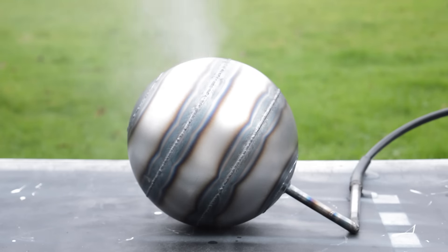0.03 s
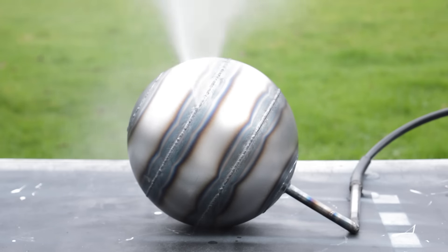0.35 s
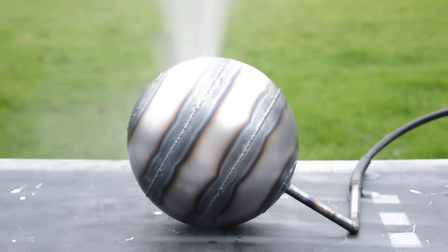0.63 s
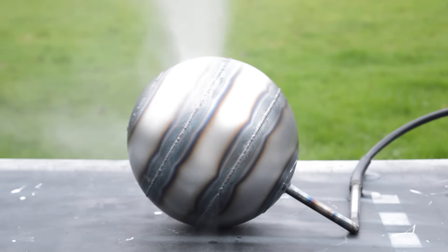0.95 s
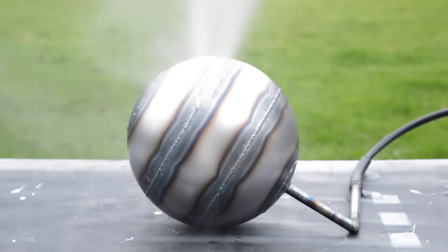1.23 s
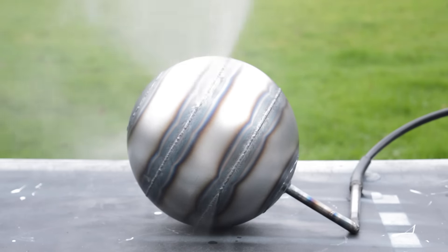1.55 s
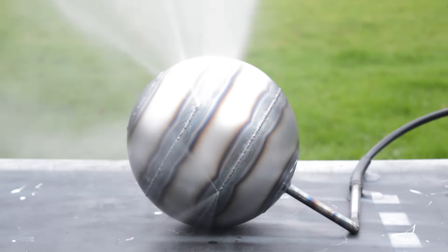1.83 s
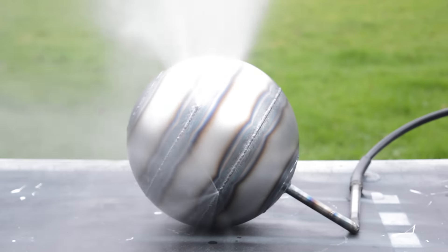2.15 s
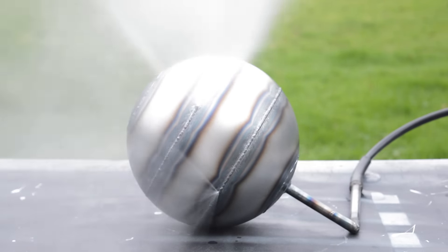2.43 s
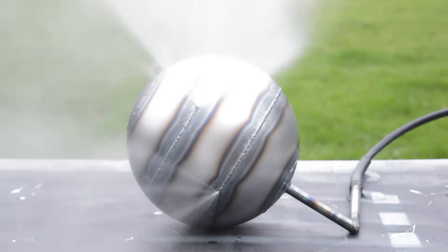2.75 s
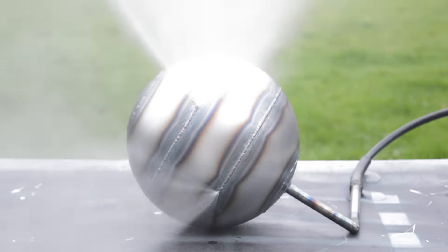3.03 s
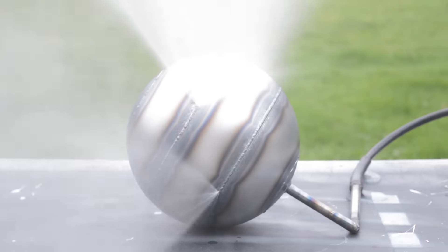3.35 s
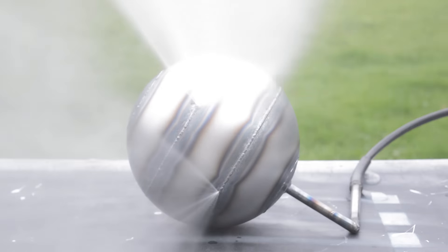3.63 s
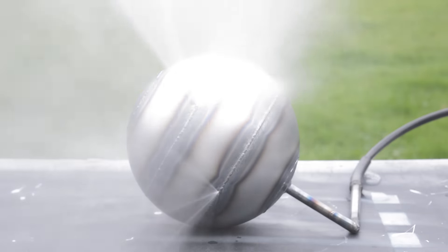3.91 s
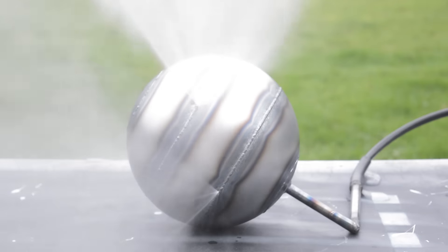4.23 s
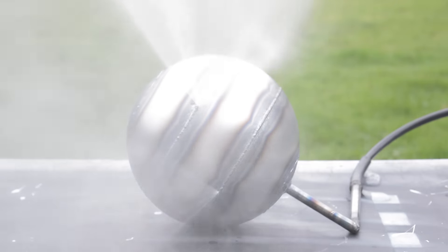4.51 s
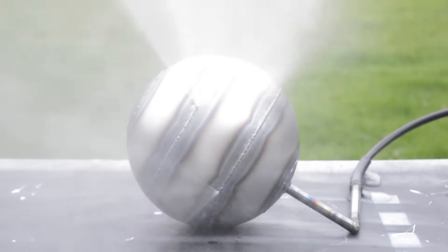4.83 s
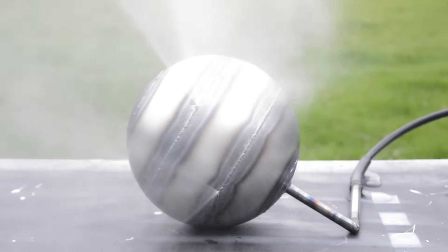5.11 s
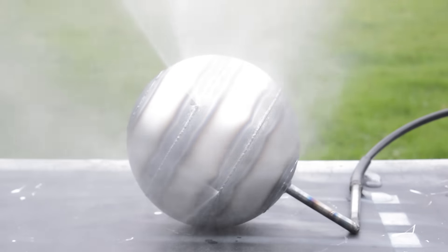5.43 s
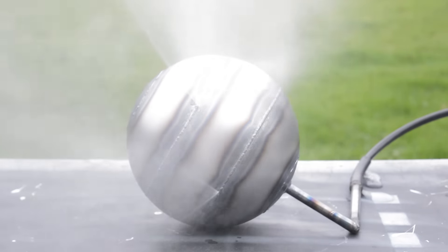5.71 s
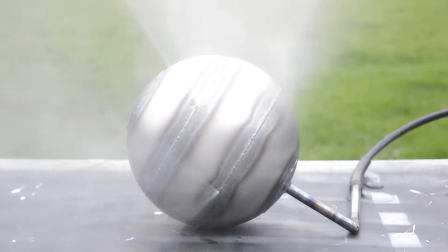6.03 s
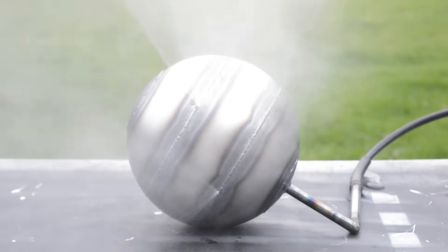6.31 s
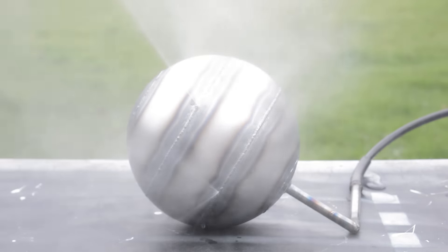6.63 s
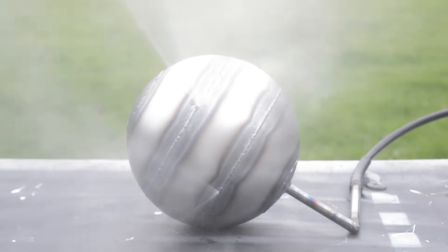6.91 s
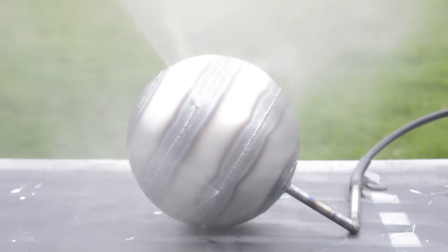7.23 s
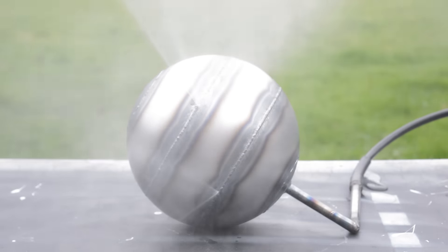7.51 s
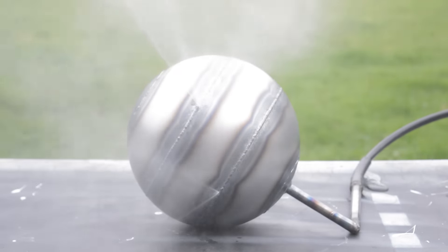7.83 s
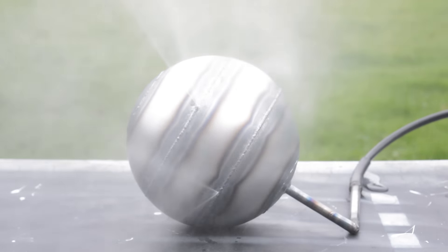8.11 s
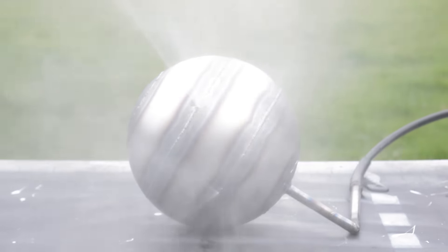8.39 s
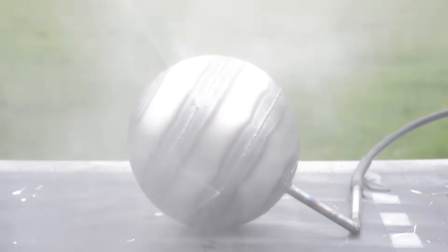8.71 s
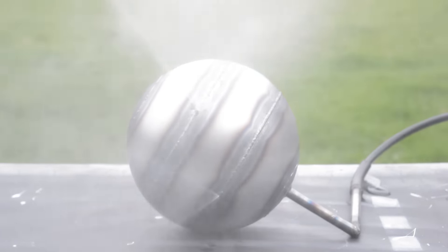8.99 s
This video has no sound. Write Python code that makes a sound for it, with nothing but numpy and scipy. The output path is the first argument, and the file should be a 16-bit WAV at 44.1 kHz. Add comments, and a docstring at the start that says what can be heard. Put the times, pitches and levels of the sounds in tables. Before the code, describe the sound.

Outdoors, a pressure washer pump runs from the start with a steady geared whine, a low hum and a light valve rattle. A fine hiss of water from a pinhole in a steel ball spurts briefly around 0.4 and 0.9 seconds and grows louder. At 1.7 seconds a seam splits and the hiss jumps to a wide, bright spray, swelling to its loudest at about 3 to 3.6 seconds. At 3.5 seconds a switch snaps off, the hose jolts with a few knocks, and the pump winds down within half a second. The spray continues, gradually thinner and duller as the pressure sinks. Soft hollow hose knocks come around 4.6, 5.8, 6.5, 6.9 and 7.9 seconds, with short scrapes near 6.4 and 7.6 seconds. A faint breeze rumbles on the microphone. Everything fades out from 8.6 to about 9.3 seconds.

```python
"""Outdoors, a pressure washer pumps water into a welded steel ball: a geared motor whines, three
plungers hum, valves rattle. A pinhole in a weld spurts and hisses ever louder, and at 1.7 s a seam
splits into a wide spray. At 3.5 s the switch snaps off, the hose jolts and the pump coasts down.
The spray dulls as the pressure sinks, the hose knocks and drags about in a light breeze,
and the scene fades out."""
import sys
import numpy as np
from scipy import signal
from scipy.fft import rfft, irfft
from scipy.io import wavfile
from scipy.ndimage import uniform_filter1d, map_coordinates

SR = 44100
rng = np.random.default_rng(int(sys.argv[2]) if len(sys.argv) > 2 else 0)


def wav_out(sig):
    """Save sig, one row per channel (or a flat mono array), as 16-bit PCM at SR to the path in sys.argv[1]."""
    wavfile.write(sys.argv[1], SR, np.round(np.clip(np.atleast_2d(sig).T, -1, 1) * 32767).astype(np.int16))


N = 408359
TIME = np.arange(N) / SR
SPLIT_S, SWITCH_OFF_S = 1.686, 3.472
GEAR_TEETH, PINION_TEETH = 45, 11

# the jet from the split seam: t/s, treble level/dB, pressure (0 soft spray, 1 hard spray)
JET = [(1.7, -43, 0.84), (2.3, -40.5, 0.82), (3.13, -36, 0.82), (3.6, -36, 1), (3.9, -38.5, 0.86),
       (4.4, -40, 0.67), (5.33, -43.8, 0.47), (5.53, -41.5, 0.46), (6.7, -42.5, 0.27), (8.5, -42, 0.017)]
# tone of the spray at high pressure: f/Hz, relative level/dB
SPRAY_HARD = [(50, -27), (130, -19), (280, -16), (600, -11.5), (1200, -10), (2500, -5), (3400, -3),
              (4000, -6.5), (5300, -1.5), (7200, -7), (8500, -6.5), (12200, -2), (15600, -7.5)]
# tone of the spray at low pressure: f/Hz, relative level/dB
SPRAY_SOFT = [(50, -46), (130, -27.5), (330, -28), (650, -23.5), (1250, -22.5), (1700, -18), (2550, -7.5),
              (4000, -4.5), (5200, -1), (7200, -7.5), (9600, -7.5), (12200, -8), (15600, -18)]
# the steel ball's colour on the spray: f/Hz, width/Hz, gain/dB
SHELL = [(837, 62, 11), (3800, 140, -3.5), (4180, 130, -2), (4640, 180, 1), (5000, 440, 1), (8400, 290, -5),
         (11070, 570, -2), (13200, 440, -3), (14000, 700, 2)]
# tone of the pinhole's hiss: f/Hz, relative level/dB
LEAK_TONE = [(500, -24), (2500, 1.5), (5300, 4), (8000, -4), (10500, 1), (13000, 1), (15700, 0.5)]
# the hiss swells as the pinhole widens, then recedes: t/s, level/dB
LEAK_LEVEL = [(0, -68), (.9, -61.5), (1.3, -52), (3.5, -49.5), (5, -64)]
# brief jets from the pinhole: start/s, length/s, level/dB
SPURTS = [(.32, .41, -59.5), (0.393, .045, -51.5), (.94, .03, -59)]
# the pump shaft under power, sagging as the load grows: t/s, speed/(turns/s)
SHAFT_SPEED = [(0, 69.45), (.57, 69.24), (1.1, 69.17), (1.55, 68.95), (1.85, 68.93), (2.2, 68.72),
               (2.85, 68.72), (3.15, 68.59), (3.47, 68.65)]
# plunger hum: multiple of the pump shaft, relative level/dB
PLUNGER_HUM = [(2, -64.5), (3, -45.5), (4, -55), (5, -61), (6, -52.5)]
# valve buzz: multiple of the pump shaft, relative level/dB
VALVE_BUZZ = [(7, -65), (8, -62.5), (9, -59), (11, -58), (12, -51), (13, -53), (14, -61.5), (15, -58.5),
              (16, -82), (17, -60.5), (21, -66.5), (23, -67), (25, -69.5), (28, -65), (31, -71.5),
              (36, -70), (40, -70.5)]
# tone of the valve clatter: f/Hz, relative level/dB
RATTLE_TONE = [(60, -14), (150, -14), (250, -10), (600, -8), (920, 1), (1400, -7.5), (2300, -11),
               (3150, -5.5), (4300, -15.5), (5600, -14), (6800, -20), (9500, -23.5), (15000, -49)]
# the load rides the drive's levels: t/s, gear and bearing gain/dB, motor whistle gain/dB
LOAD = [(0, 4, -2), (1.7, 3, -1.5), (2.15, 1.3, -2.5), (2.8, 3, -2.5), (3, 4, -11.5), (3.45, 5.5, -12)]
# gear whine: multiple of the tooth rate, relative level/dB
GEAR_WHINE = [(1, -52), (2, -73.5), (3, -75)]
# bearing tones at full speed: f/Hz, relative level/dB
BEARINGS = [(3015, -64), (3213, -64.5), (3298, -68), (3328, -67), (3610, -64.5)]
# whistle of the motor slots: multiple of the motor shaft, relative level/dB
MOTOR_WHISTLE = [(2, -66.5), (3, -60), (12, -52.5), (13, -64), (18, -70), (20, -64), (24, -78)]
# motor hum: multiple of the motor shaft, level/dB
MOTOR_HUM = [(1, -51)]
# resonances of the switch: f/Hz, width/Hz, gain/dB
SWITCH_MODES = [(1310, 280, -11), (1830, 250, 5), (2750, 350, 4)]
# bumps of pump and hose: t/s, ring peak/dB, ring f/Hz, thump against ring/dB, contact length/s
KNOCKS = [(3.4743, -24.5, 1010, -24, 0.024), (3.596, -33, 870, -7.5, 0.05), (3.674, -43, 830, -18, .024),
          (4.581, -42.5, 780, -4, 0.044), (4.625, -48, 900, -5, 0.048), (4.732, -47.5, 840, -8, 0.036),
          (5.53, -60, 700, 6, 0.044), (5.775, -45.5, 850, -6, .05), (6.482, -51, 790, 6.5, 0.057),
          (6.93, -46, 740, 2.5, 0.023), (6.963, -47.5, 725, 2, 0.022), (7.876, -41, 900, -24, .02),
          (7.921, -42.5, 850, -19, .029)]
# drags of the hose: start/s, length/s, ring level at mid-stroke/dB, ring f/Hz, rub against ring/dB
SCRAPES = [(6.368, 0.083, -47.5, 940, -9.5), (7.595, 0.062, -52, 980, -4), (7.635, 0.15, -50.5, 890, -15),
           (7.781, 0.062, -52, 920, -17), (9.014, 0.12, -52, 750, -8)]
# tone of the wind's rumble: f/Hz, relative level/dB
WIND_TONE = [(10, -5.5), (25, 2.5), (38, -3.5), (50, -2.5), (75, -10.5), (130, -21.5), (300, -44),
             (1000, -75)]
# puffs of wind: middle/s, length/s, level/dB
GUSTS = [(.3, .3, -68.5), (.9, .12, -67), (1.5, .3, -72), (1.87, .22, -64), (5.35, .17, -58),
         (6.03, .09, -63), (6.33, .1, -67), (6.816, .1, -65), (7.38, .18, -64), (8.35, 1, -66.5),
         (8.94, .3, -59)]
# reflections off the bench and things near by: delay/s, gain/dB
ECHOES = [(.0031, -27), (.0047, -24), (.0083, -24), (0.014, -27), (.021, -24)]
# the closing fade: t/s, gain/dB
FADE = [(0, 0), (8.58, 0), (8.8, -7), (9, -13), (9.13, -20.5), (9.26, -28.5)]


def spray(patchy_db=0.46, flicker_db=0.41, treble_hz=3800, opening_s=0.0038):
    """The split seam: a turbulent jet that loses its roar and its top as the pressure sinks."""
    hz, t, noise = signal.stft(rng.standard_normal(N), SR, nperseg=512, noverlap=384)
    pressure = np.interp(t, TIME, curve(JET, column=2))
    colour_db = np.outer(tone_db(SPRAY_SOFT, hz), 1 - pressure)
    colour_db += np.outer(tone_db(SPRAY_HARD, hz), pressure)
    colour_db += sum(db / (1 + ((hz - f) / width * 2) ** 2) for f, width, db in SHELL)[:, None]
    shape = gain_of(colour_db)
    shape /= np.sqrt((shape[hz > treble_hz] ** 2).sum(0) / len(hz))  # morph at constant treble power
    # turbulence: patches of the spectrum shimmer, and the whole jet flickers
    patches = uniform_filter1d(rng.standard_normal(noise.shape), size=14, axis=0)
    patches = unit_rms(uniform_filter1d(patches, size=22, axis=1))
    flicker = unit_rms(uniform_filter1d(rng.standard_normal(len(t)), size=9))
    turbulence = gain_of(patchy_db * patches + flicker_db * flicker)
    jet = signal.istft(noise * shape * turbulence, SR, nperseg=512, noverlap=384)[1][:N]
    attack = np.clip((TIME - SPLIT_S) / opening_s, 0, 1)
    return jet * attack * gain_of(curve(JET))


def leak(roughness=0.08, spurt_edge_s=0.015):
    """Water squeezes through a pinhole in a weld: a fine hiss with a few early spurts."""
    power = gain_of(curve(LEAK_LEVEL)) ** 2
    for start, length, db in SPURTS:
        gate = np.clip(np.minimum(TIME - start, start + length - TIME) / spurt_edge_s + .5, 0, 1)
        power += (gain_of(db) * gate) ** 2
    hiss = rng.standard_normal(N) * (1 + roughness * drift(200))
    return np.sqrt(power) * coloured(hiss, LEAK_TONE)


def pump(trim_db=-0.8, coast_s=0.33, friction_turns_per_s2=22, coast_db_per_s=115, cut_db_per_s=800):
    """Plungers, valves and drive ride one shaft; switched off, it slows against water and dry friction."""
    coasted_s = np.maximum(TIME - SWITCH_OFF_S, 0)
    speed = curve(SHAFT_SPEED) * np.exp(-coasted_s / coast_s) - friction_turns_per_s2 * coasted_s
    speed = np.maximum(speed, 0)
    turns = np.cumsum(speed) / SR + 0.0002 * drift(25)  # a touch of jitter
    body = tones(turns, PLUNGER_HUM, waver=0.02) + tones(turns, VALVE_BUZZ, waver=0.074)
    body += valve_rattle(turns)
    body *= gain_of(trim_db - coast_db_per_s * coasted_s)
    # the drive sings only while the motor pulls
    drive = (gears(turns) + motor(turns)) * gain_of(-cut_db_per_s * coasted_s)
    return (body + drive) * (speed > 0)


def valve_rattle(turns, gain_db=-49, looped_share=0.23, shaft_depth=0.098, valve_depth=0.093):
    """Valves clatter in the housing three times a turn; part of the clatter loops with every turn."""
    pattern = signal.resample(rng.standard_normal(640), 5120)
    loop = pattern[(turns % 1 * len(pattern)).astype(int)]
    clatter = np.sqrt(looped_share) * loop + np.sqrt(1 - looped_share) * rng.standard_normal(N)
    shaft_pulse = 1 + shaft_depth * np.cos(2 * np.pi * turns)
    valve_pulse = 1 + valve_depth * np.cos(2 * np.pi * 3 * turns)
    return gain_of(gain_db) * coloured(clatter * shaft_pulse * valve_pulse, RATTLE_TONE)


def gears(turns, eccentricity=0.59, wobble_teeth=0.045, full_turns_per_s=69.3):
    """Teeth and bearings sing; an off-centre wheel presses and slows the teeth once a turn."""
    teeth = turns * GEAR_TEETH - wobble_teeth * np.sin(2 * np.pi * turns)
    tremolo = 1 + eccentricity * np.cos(2 * np.pi * turns)
    whine = tones(teeth, GEAR_WHINE, waver=0.084) * tremolo
    bearings = tones(turns, [(hz / full_turns_per_s, db) for hz, db in BEARINGS], waver=0.27)
    return (whine + bearings) * gain_of(curve(LOAD))


def motor(turns):
    """The motor's slots whistle, and its shaft tone beats against the pump's fourth harmonic."""
    motor_turns = turns * GEAR_TEETH / PINION_TEETH
    whistle = tones(motor_turns, MOTOR_WHISTLE, waver=0.22) * gain_of(curve(LOAD, column=2))
    return whistle + tones(motor_turns, MOTOR_HUM, waver=0.037)


def switch(peak_db=-24, snap_s=0.0001):
    """The switch snaps open: a tiny impulse rings its resonances into a click."""
    snap = np.exp(-np.arange(SR // 20) / SR / snap_s)
    click = sum(gain_of(db) * resonate(snap, hz, width) for hz, width, db in SWITCH_MODES)
    out = np.zeros(N)
    add(out, SWITCH_OFF_S, gain_of(peak_db) * unit_peak(click))
    return out


def knocks(scuff=0.14, slide_s=0.1):
    """The stopping pump jolts the hose; later hose and lance bump: a hollow ring over a dull thump."""
    out, t = np.zeros(N), np.arange(SR // 5) / SR
    for start, db, ring_hz, thump_db, length in KNOCKS:
        tap = np.exp(-(length / slide_s) ** 2)  # short contacts tap, long ones slide in softly
        attack = 1 - (1 - tap) * np.exp(-5 * t / length)
        blow = scuff * rng.standard_normal(len(t)) * attack * np.exp(-2 * t / length)
        blow[0] += 2 * tap
        blow = softened(blow)
        ring = unit_peak(resonate(blow, ring_hz, width_hz=135))
        thump = unit_peak(resonate(blow, hz=280, width_hz=230))
        add(out, start, gain_of(db) * (ring + gain_of(thump_db) * thump))
    return out


def scrapes(chatter=0.27, chatter_hz=160):
    """The dragging hose sticks and slips; each stroke swells and fades, a hollow ring over a dull rub."""
    out = np.zeros(N)
    grip = softened(rng.standard_normal(N) * np.exp(chatter * drift(chatter_hz)))
    for start, length, db, ring_hz, rub_db in SCRAPES:
        friction = grip[round(start * SR):][:round(length * SR)]
        stroke = np.sin(np.linspace(0, np.pi, len(friction)))
        ring = stroke * unit_rms(resonate(friction, ring_hz, width_hz=135))
        rub = np.sqrt(abs(stroke)) * unit_rms(resonate(friction, hz=310, width_hz=180))
        add(out, start, gain_of(db) * (ring + gain_of(rub_db) * rub))
    return out


def wind(breeze_db=-77, restless_db=2):
    """A light, restless breeze rumbles on the microphone, with gusts on top."""
    power = gain_of(breeze_db + restless_db * drift(6)) ** 2
    for middle, length, db in GUSTS:
        swell = np.exp(-np.minimum((2 * (TIME - middle) / length) ** 2, 50))
        power += (gain_of(db) * swell) ** 2
    return np.sqrt(power) * coloured(rng.standard_normal(N), WIND_TONE)


def echoed(x):
    """Short reflections ripple the spectrum."""
    out = x.copy()
    for delay, db in ECHOES:
        add(out, delay, gain_of(db) * x)
    return out


def tones(turns, partials, waver):
    """Partials locked to a shaft, each wavering in strength."""
    out = np.zeros(N)
    for multiple, db in partials:
        amplitude = gain_of(db) * np.sqrt(2) * (1 + waver * drift(14))
        out += amplitude * np.cos(2 * np.pi * (multiple * turns + rng.random()))
    return out


def resonate(x, hz, width_hz):
    """One damped resonance."""
    r = np.exp(-np.pi * width_hz / SR)
    return signal.lfilter([1, 0, -1], [1, -2 * r * np.cos(2 * np.pi * hz / SR), r * r], x)


def softened(x, cutoff_hz=1900):
    """Rolls the top off a contact."""
    return signal.sosfilt(signal.butter(2, cutoff_hz, fs=SR, output="sos"), x)


def coloured(x, tone):
    """Equalises a sound with a tone table, at rms 1."""
    return unit_rms(irfft(rfft(x) * gain_of(tone_db(tone, np.fft.rfftfreq(N, 1 / SR))), N))


def tone_db(tone, hz):
    """Reads a tone table on a log-frequency axis."""
    f, db = np.transpose(tone)
    return np.interp(np.log(hz + 1), np.log(f), db)


def curve(rows, column=1):
    """One column of a time table at every sample."""
    rows = np.array(rows)
    return np.interp(TIME, rows[:, 0], rows[:, column])


def drift(rate_hz):
    """Smooth random modulation of rms 1."""
    knots = rng.standard_normal(2048)
    return unit_rms(map_coordinates(knots, [TIME[::32] * rate_hz], mode="wrap")).repeat(32)[:N]


def add(mix, start_s, sound):
    """Lays a sound into the mix."""
    part = mix[round(start_s * SR):][:len(sound)]
    part += sound[:len(part)]


def gain_of(db):
    """Decibels to a factor."""
    return 10 ** (np.asarray(db) / 20)


def unit_rms(x):
    """Scales to rms 1."""
    return x / np.sqrt(np.mean(x ** 2) + 1e-20)


def unit_peak(x):
    """Scales to peak 1."""
    return x / abs(x).max()


def scene():
    """All layers in one mono mix, alike on both sides."""
    mix = pump() + switch() + echoed(leak() + spray()) + knocks() + scrapes() + wind()
    return np.array([mix, mix])


def record(dry, top_hz=15750):
    """The closing fade, then a steep high cut."""
    high_cut = signal.firwin(1023, top_hz, window=("kaiser", 9), fs=SR)
    return signal.oaconvolve(dry * gain_of(curve(FADE)), high_cut[None], "same")


dry = scene()
out = record(dry)
wav_out(out)
```